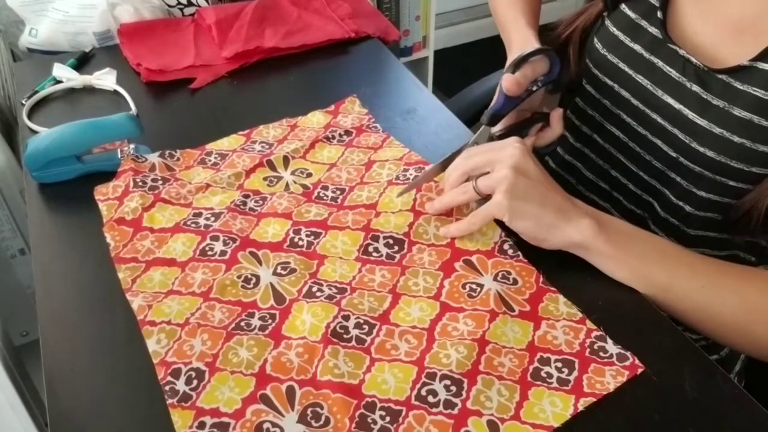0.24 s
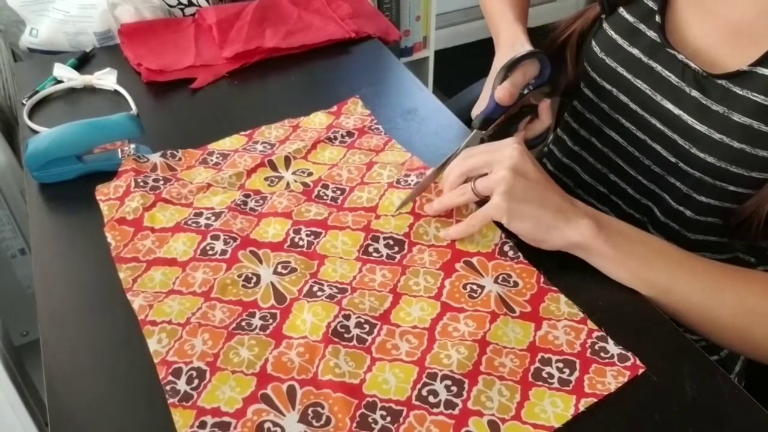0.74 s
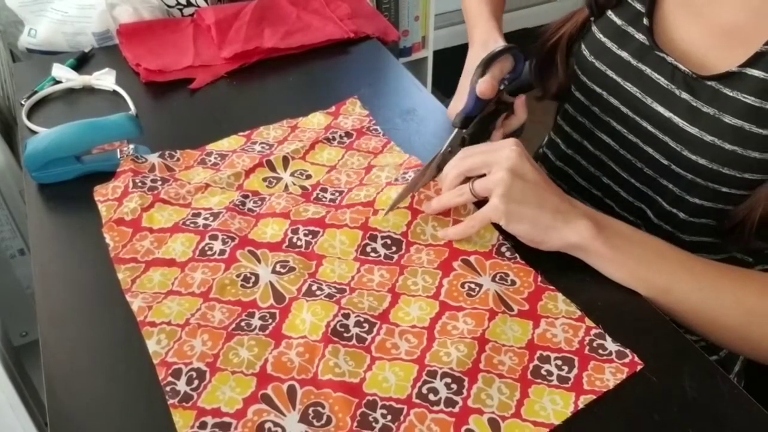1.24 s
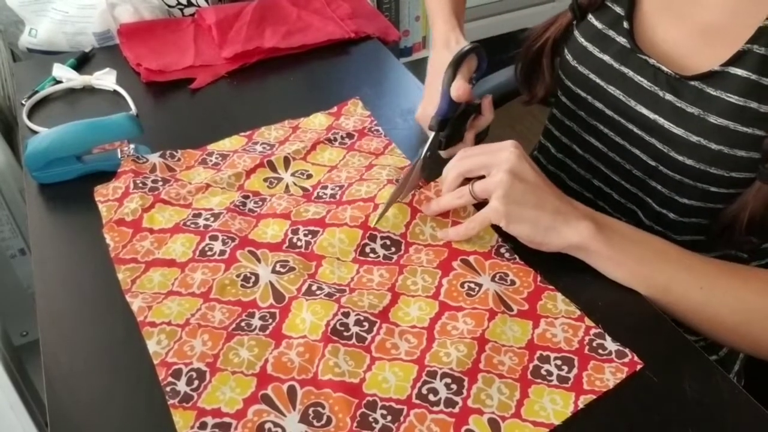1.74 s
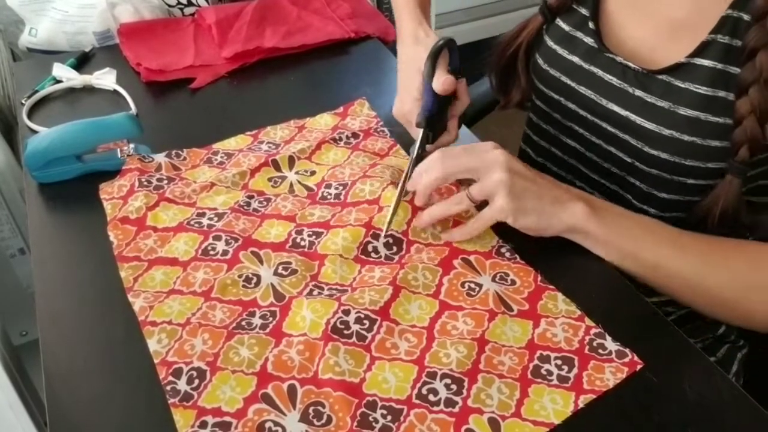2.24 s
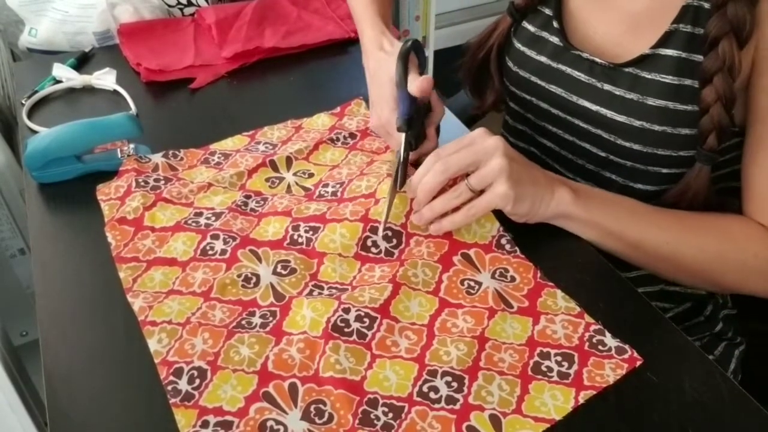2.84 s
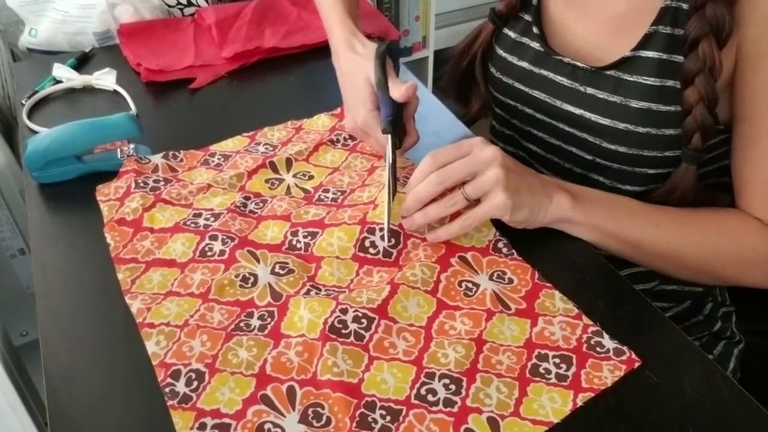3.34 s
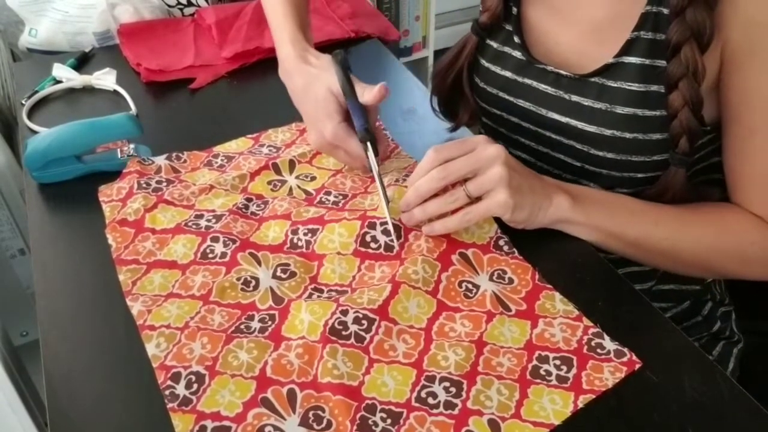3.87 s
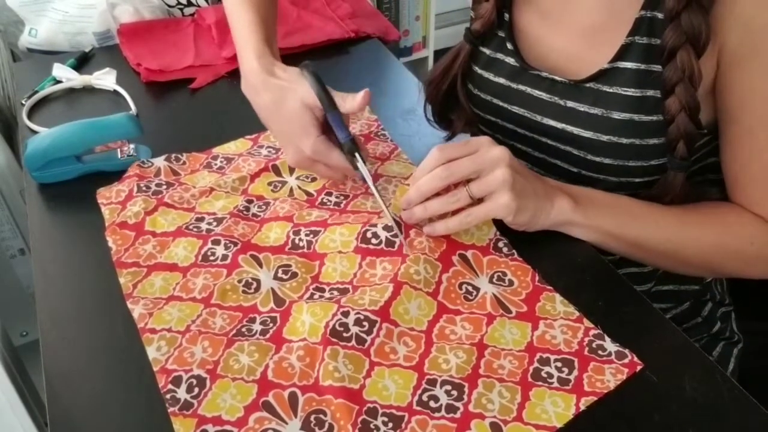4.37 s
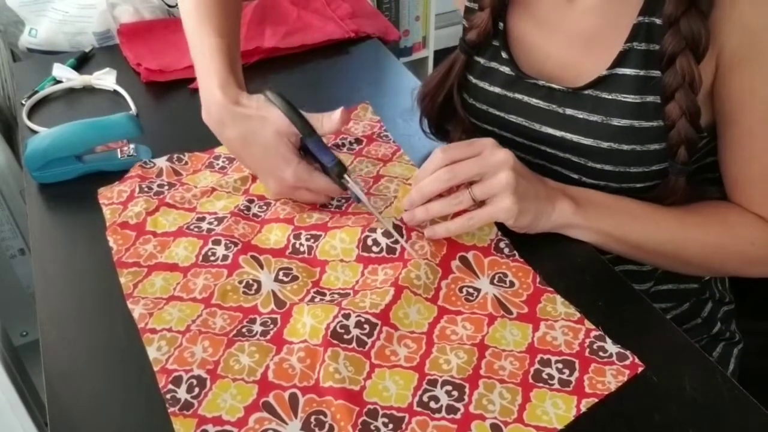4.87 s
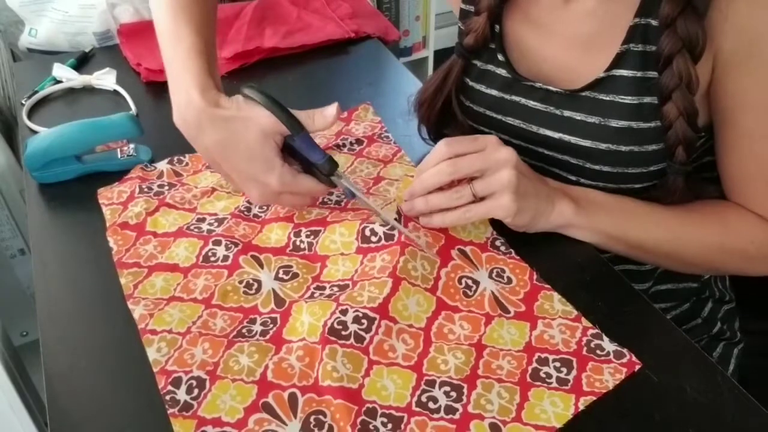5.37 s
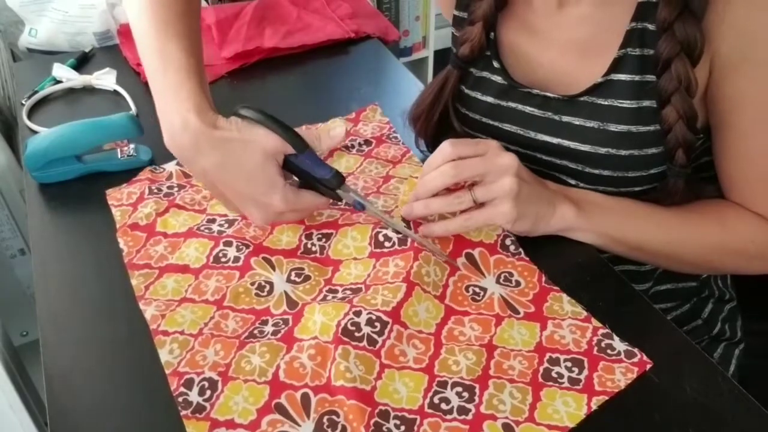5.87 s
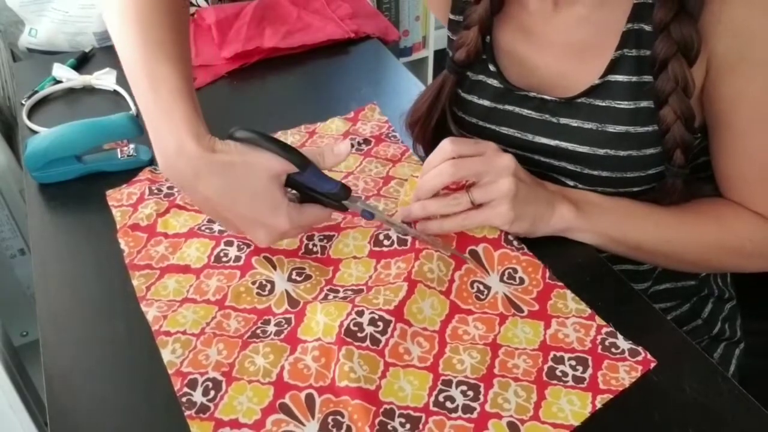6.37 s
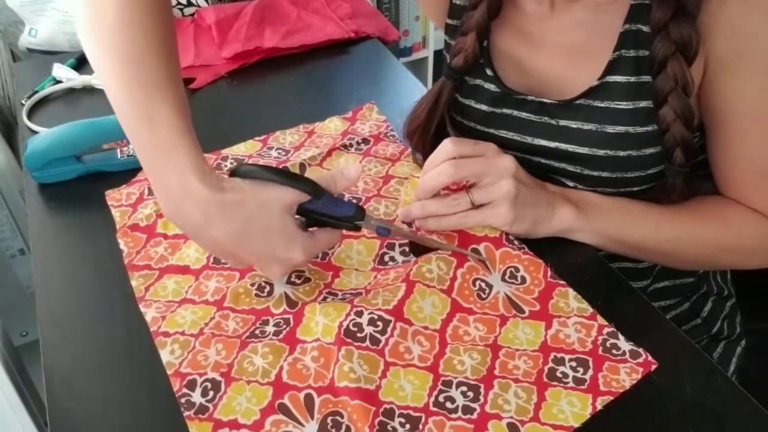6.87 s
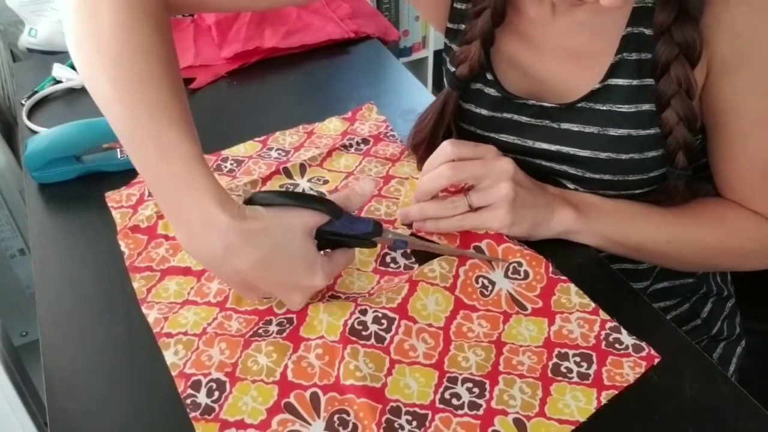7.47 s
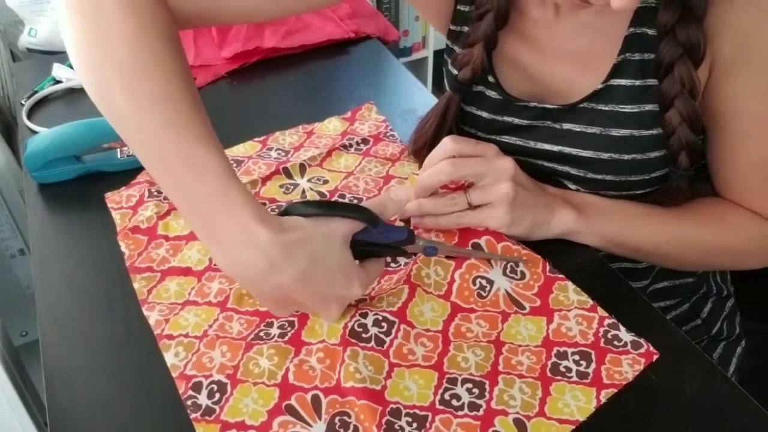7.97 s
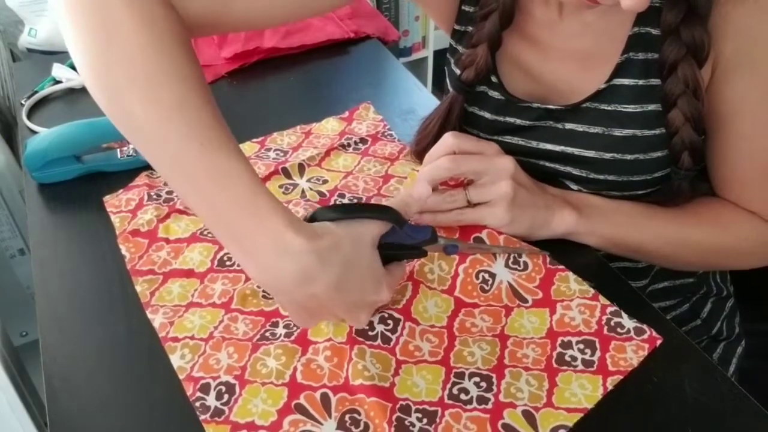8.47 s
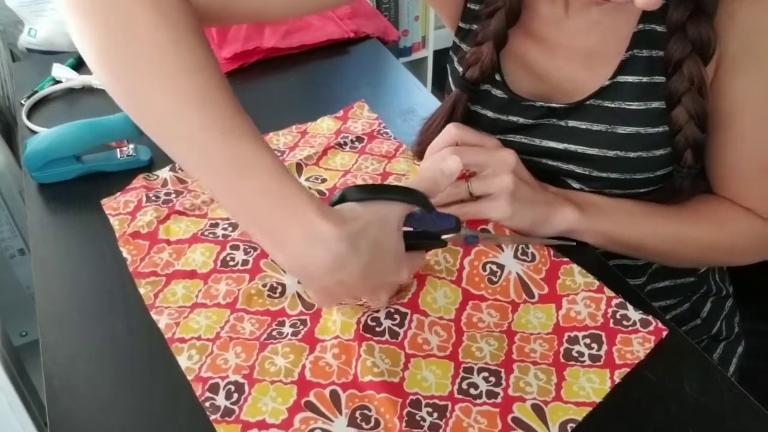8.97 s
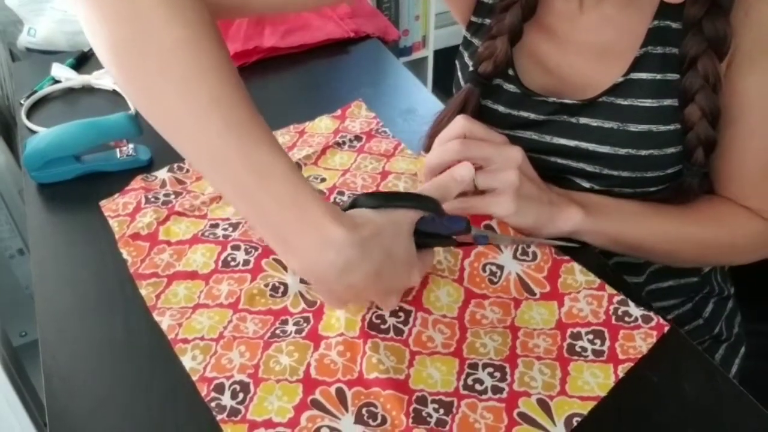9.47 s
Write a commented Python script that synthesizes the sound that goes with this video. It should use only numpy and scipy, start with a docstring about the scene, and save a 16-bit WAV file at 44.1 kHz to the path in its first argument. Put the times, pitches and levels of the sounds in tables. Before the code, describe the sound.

Scissors snip through cotton cloth on a table in a quiet room, with crisp rasping cuts, hollow wooden knocks and one small squeak.

```python
"""Scissors cutting cotton on a table

Scissors cut a cotton sheet in a small, quiet room: filtered snaps and rubbing make the steel rasp, with ringing.
At first the lower blade also lies on the top, which booms as a resonator with snapping threads and knocks.
Then the scissors are lifted and the thin rasp leads; at last they knock down again and once squeak by stick-slip.
A brief squeal of tight edges marks an early cut. Faint hiss, air noise and two sine hums lie beneath."""
import sys
import numpy as np
from scipy import signal
from scipy.fft import rfft, irfft
from scipy.io import wavfile
from scipy.ndimage import uniform_filter1d

SR = 44100
rng = np.random.default_rng(int(sys.argv[2]) if len(sys.argv) > 2 else 0)


def to_wav(sig):
    """Store sig (one row per channel, or 1-D mono) as 16-bit WAV at the path in sys.argv[1].

    Samples outside -1..1 are clipped; the rate is SR.
    """
    pcm = np.clip(np.atleast_2d(sig), -1, 1) * 32767
    pcm = np.round(pcm).astype(np.int16)
    wavfile.write(sys.argv[1], SR, pcm.T)  # frames by channels


N = 428652
TIME = np.arange(N) / SR  # s


def amp(db):
    """Level to amplitude ratio: 20 dB is a factor of ten."""
    return 10 ** (np.asarray(db) / 20)


def evened(x):
    """Normalization to an rms value of 1."""
    return x / np.sqrt(np.mean(x ** 2) + 1e-20)


def read(points, hz):
    """Linear interpolation of a spectrum on a log-frequency axis."""
    f, value = np.transpose(points)
    return np.interp(np.log(hz + 1), np.log(f + 1), value)


def add(mix, s, sound):
    """Superposition: a sound of one or more channels joins the mix at time s."""
    part = mix[:, max(round(s * SR), 0):][:, :sound.shape[1]]
    part += sound[:, :part.shape[1]]


def band(x, lo_hz, hi_hz):
    """Causal Butterworth band-pass."""
    sections = signal.butter(3, [lo_hz, min(hi_hz, SR / 2 - 1)], "band", fs=SR, output="sos")
    return signal.sosfilt(sections, x)


def convolve(x, response):
    """Linear system: output is the convolution of input and impulse response."""
    return signal.oaconvolve(np.atleast_2d(x), np.atleast_2d(response), axes=1)[:, :N]


def bell(hz, centre_hz, width_hz):
    """Lorentzian resonance curve, 1 at its centre."""
    return 1 / (1 + (2 * (hz - centre_hz) / width_hz) ** 2)


def ring(spectrum, modes=(), size=4096):
    """Minimum-phase impulse response of a body with this spectrum and these modes, energy 1."""
    hz = abs(np.fft.fftfreq(size, 1 / SR))
    db = read(spectrum, hz) + sum(lift * bell(hz, f, width) for f, width, lift in modes)
    # the Hilbert transform of the log magnitude gives the phase of a causal body
    log_response = np.conj(signal.hilbert(np.log(amp(db))))
    h = np.fft.ifft(np.exp(log_response)).real[:size // 2]
    return h / np.linalg.norm(h)


def resonate(x, hz, width_hz):
    """Tracking resonator of gain 1: shift the curve hz to zero, smooth with one pole, shift back."""
    turn = np.exp(2j * np.pi * np.cumsum(hz) / SR)
    r = np.exp(-np.pi * width_hz / SR)
    smoothed = signal.lfilter([1 - r], [1, -r], x / turn + 1e-18)
    return 2 * (turn * smoothed).real


def grains(per_s, spread_db, rub):
    """Point process: tiny snaps of uneven size over smooth noise, at a steady mean power."""
    size = amp(spread_db * np.minimum(rng.exponential(1, N), 4)) * rng.choice([-1, 1], N)
    snaps = evened(size * (rng.random(N) < per_s / SR))
    x = snaps + rub * rng.standard_normal(N)
    return x / np.sqrt(uniform_filter1d(x ** 2, size=1300) + 1e-9)


def wander(per_s):
    """Slow random modulation of rms 1, with per_s random values a second joined by lines."""
    values = rng.standard_normal(8192)
    return evened(np.interp(TIME * per_s, np.arange(len(values)), values))


def envelope(start, length, swell_db, attack_s, release_s):
    """Amplitude history: linear rise, a hold that swells or sags about gain 1, exponential release."""
    t = TIME - start
    held = amp(swell_db * (np.clip(t / length, 0, 1) - .5))
    return np.clip(t / attack_s, 0, 1) * held * np.exp(-np.clip((t - length) / release_s, 0, 20))


# likeness of diffuse sound at the two microphones: (f/Hz, coherence)
COHERENCE = [(30, .99), (200, .99), (330, .96), (600, .4), (1100, .05), (15000, 0)]


def diffuse(count):
    """Diffuse-field coherence: white noise from all sides is alike at both microphones only in the bass."""
    a, b = rfft(rng.standard_normal((2, count)))
    same = np.clip(read(COHERENCE, np.fft.rfftfreq(count, 1 / SR)), -1, 1)
    return irfft([a, same * a + np.sqrt(1 - same ** 2) * b], count)


def room(wet_db, t60, treble_t60, scatter_db, lag_ms=0, right_db=0, count=16000):
    """Room impulse response of energy 1: direct sound, early scatter and exponentially decaying tail."""
    t, hz = np.arange(count) / SR, np.fft.rfftfreq(count, 1 / SR)
    noise = diffuse(count)
    treble = irfft(rfft(noise) * read([(1000, 0), (10000, 1)], hz), count)
    tail = (noise - treble) * amp(-60 * t / t60) + treble * amp(-60 * t / treble_t60)
    tail *= 1 - np.exp(-t / 0.0045)  # gradual build-up
    scatter = diffuse(count) * np.exp(-t / 0.0034)
    h = amp(wet_db) * tail / np.linalg.norm(tail[0])
    h += amp(scatter_db) * scatter / np.linalg.norm(scatter[0])
    h[:, 0] += 1  # direct sound
    z = rfft(np.roll(h, 44, axis=1))  # all of it starts 44 samples late
    # above the bass the left microphone receives it later and weaker
    apart = read([(200, 0), (340, .25), (700, 1)], hz)
    z[0] *= np.exp(-2j * np.pi * hz * apart * lag_ms / 1000) * amp(-right_db * apart)
    h = irfft(z, count) * np.minimum(1, 2 * (1 - t / t[-1])) ** 2  # fades to silence at the end
    return h / np.linalg.norm(h.mean(0))


# relative spectrum of the still room air: (f/Hz, density level/dB per Hz)
AIR_SPECTRUM = [(12, -43.5), (20, -22), (48, -4.5), (91, -9), (123, -2), (145, -14.5), (186, -8),
                (220, -17), (315, -22.5), (342, -31), (371, -25), (438, -32), (1180, -37.5), (1640, -40.5),
                (14500, -45.5)]


def air():
    """Broadband noise: still room air as a filtered diffuse field, -60 dB rms."""
    noise = irfft(rfft(diffuse(N)) * amp(read(AIR_SPECTRUM, np.fft.rfftfreq(N, 1 / SR))), N)
    return amp(-60) * evened(noise)


def motor():
    """Modulated sinusoid: a distant motor hums throughout, wavering in amplitude and phase."""
    level_db, hum_hz = -61.5, 119.1
    gain = amp(level_db + 4.2 * wander(per_s=11))
    return gain * np.sin(2 * np.pi * hum_hz * TIME + 1.48 * wander(per_s=4.5))


# relative spectrum of the faint hiss: (f/Hz, density level/dB per Hz)
HISS_SPECTRUM = [(300, -15.5), (1200, 4), (3000, -3), (7000, -6.5), (12000, 2.5), (15000, -4)]


def faint_hiss():
    """Broadband noise: a very faint, slowly wavering hiss all along."""
    noise = grains(per_s=900, spread_db=2.5, rub=0.7) * amp(-0.5 * wander(per_s=4.7))
    noise = amp(-84) * evened(convolve(noise, ring(HISS_SPECTRUM)))
    return convolve(noise, room(wet_db=0, t60=0.068, treble_t60=0.15, scatter_db=3))


# relative spectra of the table top near its edge and further in: (f/Hz, density level/dB per Hz)
EDGE_SPECTRUM = [(40, -55), (100, -16), (170, -8.5), (270, 7.5), (430, -11), (620, -2.5), (850, -4),
                 (1100, -14.5), (1900, -23.5), (3000, -30.5), (4500, -37), (7000, -46.5), (10000, -66),
                 (15000, -26)]
INNER_SPECTRUM = [(40, -30), (100, -5.5), (220, 5), (340, -4.5), (470, -11.5), (750, 2.5), (1050, -6),
                  (1400, -20.5), (2300, -14.5), (3200, -22), (4200, -28), (6500, -33.5), (9000, -42.5),
                  (15000, -42)]
# resonances of the table top: (f/Hz, width/Hz, lift/dB)
TABLE_MODES = [(120.4, 46, 15.5), (189.7, 16, 2), (231.6, 38, 7.5), (287, 58, 6.5), (369, 26, 8.5),
               (442.5, 21, 11), (523, 90, 12.5), (579, 75, 3.5), (600, 36, 1), (666, 7.5, 8), (717, 7.1, 8),
               (780.3, 31, 9.5), (916, 30, 5), (1038, 14, 7.5), (1180, 26, 3), (1260, 9.4, -3.5),
               (1273, 78, 7.5), (1479, 68, 6), (1490, 66, 1), (1660, 20, 7.5), (2439, 40, 6.5),
               (2860, 160, 5.5)]


def top(s):
    """Modal response of the plate: driven near its edge before 4 s, further in afterwards."""
    return ring(EDGE_SPECTRUM if s < 4 else INNER_SPECTRUM, TABLE_MODES, size=8192)


# the blade knocks on the table: (t/s, blow level/dB, then relative to it before fixed band trims:
# hardness as treble level/dB, hollow middle level/dB, weight as bass level/dB)
KNOCK_EVENTS = [(0.02, -43.5, -26, -5, -19), (0.441, -38, -38, -7, -7), (0.474, -31, -19, -0.5, -16),
                (0.517, -35.5, -40, -16, -25), (0.745, -51, -30, -12, -21), (0.812, -26, -16.5, -3.5, -4),
                (0.848, -34.5, -22, 2, -15), (1.141, -35.5, -13.5, 5.5, 2), (1.315, -51, -39, -31, -24),
                (1.413, -35, -36, -7.5, -19), (1.549, -27, -13.5, -0.5, -14),
                          (1.568, -26.5, -15.5, -10.5, -7), (1.689, -36.5, -40, -5, -5),
                (2.043, -30.5, -28, -8, -8), (2.072, -32, -18.5, -21, -20), (2.18, -40.5, -27, -8.5, -29),
                (2.238, -30.5, -33, -6, -18), (2.289, -34.5, -32, -15.5, -2),
                (6.172, -39.5, -39, -19.5, -11.5), (6.708, -29.5, -34, -8, -7),
                (7.193, -39.5, -40, -1.5, -30), (7.93, -33.5, -12, -7.5, -17), (7.946, -41.5, -8, 2, -14),
                (8.318, -34, -15.5, -4.5, -8), (8.42, -41, -40, -18, -17), (8.48, -42, -18, -7, -30),
                (8.916, -32, -8.5, -7, -9.5), (9.027, -34, -17.5, -3, -19), (9.583, -26.5, -27, -10, -12.5)]


def knocks():
    """Impact excitation of a plate: harder blows ring brighter, heavier ones deeper."""
    damp_s = .04  # the resting hand soon stills the deep ring of the top
    out = np.zeros((2, N))
    for s, db, hard_db, hollow_db, weight_db in KNOCK_EVENTS:
        here = room(wet_db=5.0, t60=0.22, treble_t60=0.22, scatter_db=0.0, lag_ms=0.46, right_db=2.5)
        blow = convolve(top(s), here)
        damped = blow * np.exp(-np.arange(blow.shape[1]) / SR / damp_s)
        parts = [(damped, 50, 240, weight_db + 2.0), (damped, 183, 445, -1.5),
                 (blow, 435, 1080, hollow_db - 5.5), (blow, 1380, 12000, hard_db - 3.0)]
        for sound, lo_hz, hi_hz, part_db in parts:
            part = band(sound, lo_hz, hi_hz)
            peak = np.sqrt(uniform_filter1d(part.mean(0) ** 2, size=300).max())  # highest short-time rms
            add(out, s - .001, amp(db + part_db) * part / peak)
    return out


# the lower blade bears on the top as it cuts or slides: (t/s, length/s, boom drive level/dB,
# swell/dB, then relative to the boom: hollow middle level/dB, scratch level/dB)
SLIDE_EVENTS = [(0.025, 0.13, -55, -16.5, 0.5, -30.5), (0.366, 0.079, -57.5, 18, 1, -8),
                (0.43, .08, -45, 10, 2, -13), (0.52, .2, -58, -1, -3, -22),
                (0.732, 0.032, -52.5, 9, 0.5, -22), (0.769, 0.088, -39, 5, 2.5, -13),
                (0.897, 0.269, -57, 8, 1.5, -15.5), (1.122, 0.051, -31, -8.5, -1.5, -16.5),
                (1.303, .16, -51.5, -8, 0, -9.5), (1.536, 0.041, -39.5, -0.5, 9, -10),
                (1.59, 0.11, -54, -6, -1, -13), (1.731, 0.099, -52.5, -1, 0, -14.5),
                (1.853, 0.15, -54, 1, -2.5, -27), (2.042, 0.089, -49.5, -14, -1.5, -21),
                (2.232, 0.12, -57, -13.5, -2, -16), (6.176, 0.048, -56, -8, -12.5, -34),
                (6.698, 0.058, -45, -9.5, -3, -21), (7.184, 0.13, -49.5, 2, -1, -14.5),
                (7.317, 0.053, -55.5, -16.5, 7.5, -0.5), (7.933, 0.12, -52.5, -18, -13, -12),
                (8.319, 0.18, -51.5, -10, -6, -16), (8.988, .15, -49, -6.5, -2.5, -13.5),
                (9.159, 0.083, -53, 4.5, -28, -29), (9.582, 0.11, -48, -19, -3, -15)]


def crunch():
    """Forced vibration of a plate: snapping threads and the sliding blade drive the table top."""
    out = np.zeros((2, N))
    snaps = grains(per_s=520, spread_db=3.5, rub=0.53) * amp(4.7 * wander(per_s=55))
    for start, length, db, swell_db, hollow_db, scratch_db in SLIDE_EVENTS:
        force = amp(db) * envelope(start, length, swell_db, attack_s=0.011, release_s=.016)
        inside = (TIME >= start) & (TIME <= start + length + .1)
        shaken = signal.oaconvolve(snaps[inside], top(start))[:inside.sum()]
        # boom, hollow middle, scratch
        parts = [(40.3, 404, 0), (510, 1140, hollow_db), (1367, 5700, scratch_db)]
        sound = sum(evened(band(shaken, lo_hz, hi_hz)) * amp(part_db) for lo_hz, hi_hz, part_db in parts)
        here = room(wet_db=2.5, t60=0.15, treble_t60=0.26, scatter_db=-1.5, lag_ms=0.5, right_db=1.5)
        add(out, start, convolve(force[inside] * sound, here))
    return out


def cuts():
    """Grouping in time: squeezes in quick succession make one closing, with a start and an end."""
    start, length = np.transpose(SQUEEZE_EVENTS)[:2]
    end = start + length
    reopened = start[1:] - end[:-1] > .15  # a longer wait, in s, begins a new cut
    return start[np.r_[True, reopened]], end[np.r_[reopened, True]]


SQUEEZE_SHAPE = dict(attack_s=0.015, release_s=0.017)
# the hand squeezes the blades together: (t/s, length/s, rasp drive level/dB,
# swell from start to end/dB, lower hiss level relative to the rasp/dB)
SQUEEZE_EVENTS = [(0.411, 0.11, -61, 6, -1), (0.762, 0.1, -62.5, 1, -3.5), (1.123, 0.04, -54.5, 6, -6.5),
                  (1.536, 0.069, -58, -16, -7.5), (2.036, 0.032, -66.5, 11, -4.5),
                  (2.351, 0.014, -63.5, 4, -2), (2.866, 0.1, -69.5, 18, -1), (3.285, 0.079, -63, 7, -2.5),
                  (3.73, 0.028, -61.5, 1, -2), (3.79, 0.043, -64.5, -22, 2), (4.231, 0.061, -55.5, 1.5, -4),
                  (5.116, .012, -60.5, 1, -5.5), (5.136, 0.058, -55.5, 3, -8), (5.688, .018, -66, -7, -8),
                  (5.747, .02, -61.5, 0, -7.5), (6.345, 0.098, -56.5, 7, -8), (6.865, 0.095, -61, 0, -0.5),
                  (7.414, .036, -55, -10, -7), (7.46, 0.069, -52, 11, -9), (7.985, 0.065, -50, 5.5, -8.5),
                  (8.466, .014, -65, 2, -6), (8.515, 0.043, -50.5, -3, -11), (8.865, 0.009, -57, 5.5, -11),
                  (9.222, 0.13, -60, 16.5, -10), (9.376, 0.011, -52, 6, -9.5)]
# gliding blade rings: (f open/Hz, f closed/Hz, width/Hz, level open/dB, level closed/dB)
GLIDING_RINGS = [(12670, 6800, 82, 20, -3), (10830, 16200, 300, -7.5, -1.5), (8650, 24000, 1200, 4, 2)]
# the edges catch and let go: (t/s, drive level/dB before a fixed trim)
CATCHES = [(3.32, -46), (3.394, -49.5), (3.8033, -39.5), (4.309, -43.5), (5.1811, -36.5), (5.7014, -49),
           (5.9836, -54), (6.3803, -40), (6.454, -39.5), (6.9008, -44), (6.9523, -40.5), (7.4824, -33.5),
           (8.5285, -40), (9.3029, -43.5), (9.351, -41.5)]
# relative spectrum of the blades: (f/Hz, density level/dB per Hz)
STEEL_SPECTRUM = [(200, -7), (600, -15), (1300, -16.5), (1950, -12.5), (2500, -20.5), (3400, -15.5),
                  (4300, -13), (5600, -9), (7300, -13.5), (8800, -13.5), (10500, -7), (12200, 5),
                  (13500, -7.5), (15000, -13.5)]
# resonances and a hollow of the blades: (f/Hz, width/Hz, lift/dB)
BLADE_MODES = [(2010, 430, -0.5), (2310, 140, 1), (3190, 460, -21), (5600, 430, 3), (7300, 3200, 1)]
# the scissors drift to the right: (t/s, level at the right microphone above the left/dB)
RIGHTWARD_DRIFT = [(0, .5), (1.6, 0), (2.9, 2.3), (5.7, 2), (6.4, 4), (9.3, 4.7)]


def blades():
    """Friction-driven resonance: edges rasp, two rings glide up and one down, a lower scrape grows."""
    starts, ends = cuts()
    closed, rasp, hiss = np.zeros((3, N))
    for start, end in zip(starts, ends):
        after = TIME >= start
        closed[after] = np.interp(TIME[after], [start, end], [.2, .7])  # 0 open, 1 closed
    for start, length, db, swell_db, hiss_db in SQUEEZE_EVENTS:
        force = amp(db) * envelope(start, length, swell_db, **SQUEEZE_SHAPE)
        rasp += force
        hiss += force * amp(hiss_db)
    friction = grains(per_s=1300, spread_db=2.5, rub=0.42)
    friction *= amp(2 * wander(per_s=250) + 1.3 * wander(per_s=70))
    rasp, hiss = friction * rasp, friction * hiss
    drive = amp(-6.5) * band(rasp, 9400, 24400) + amp(8.0) * band(hiss, 250, 9000)
    # the lower scrape grows as the crossing point nears the tips
    drive += band(hiss, 1630, 3270) * amp(-12.5 + 38.6 * closed)
    for open_hz, closed_hz, width_hz, open_db, closed_db in GLIDING_RINGS:
        hz = (open_hz + (closed_hz - open_hz) * closed) * (1 + 0.036 * wander(per_s=16))
        ring_db = open_db + (closed_db - open_db) * closed + 0.75 * wander(per_s=24)
        drive += resonate(rasp, hz, width_hz) * amp(ring_db)
    t = np.arange(900) / SR
    catches = np.zeros((1, N))
    for s, db in CATCHES:
        burst = rng.standard_normal((1, len(t))) * np.exp(-t / 0.006)
        add(catches, s - .002, amp(db - 5.5) * burst)
    steel = convolve(drive + catches[0], ring(STEEL_SPECTRUM, BLADE_MODES))[0]
    out = np.zeros((2, N))
    # the scissors have moved on at each cut, so hands and table scatter their sound anew
    for s, part in zip(starts, np.split(steel, [round(s * SR) for s in starts])[1:]):
        add(out, s, convolve(part, room(wet_db=3.5, t60=0.28, treble_t60=0.15, scatter_db=7)))
    right_db = np.interp(TIME, *np.transpose(RIGHTWARD_DRIFT))
    return out * amp(right_db * [[-.5], [.5]])


def drone():
    """Modulated sinusoid: a deep hum of the building comes and goes."""
    level_db, hum_hz = -57.5, 52.4
    gain = amp(level_db + 0.63 * wander(per_s=2.5))
    tone = gain * np.sin(2 * np.pi * hum_hz * TIME + .5 * wander(per_s=7.4))
    return tone * envelope(start=0.5, length=3.27, swell_db=0, attack_s=0.29, release_s=0.29)


def squeal():
    """Narrow-band resonance: tight edges set one blade ringing for a moment in one cut."""
    tone = evened(resonate(rng.standard_normal(N), np.full(N, 2466), width_hz=34))
    force = envelope(start=0.772, length=0.056, swell_db=9, **SQUEEZE_SHAPE)
    tone = amp(-57.5) * band(tone, 2300, 3500) * force
    return convolve(tone, room(wet_db=-11, t60=0.17, treble_t60=.2, scatter_db=4))


# arches of the squeak along the top: (t/s, length/s, f/Hz, glide/Hz per s, drive level/dB)
SQUEAK_ARCHES = [(7.226, .098, 533, -400, -39.5), (7.314, 0.041, 557, 1102, -40.5),
                 (7.352, 0.05, 562, 3, -45)]
# harmonics of the squeak: (multiple of the pitch, relative level/dB)
SQUEAK_HARMONICS = [(1, -4), (2, -21), (3, -25), (4, -40), (5, -39)]


def squeak():
    """Stick-slip oscillation: steel on the table gives gliding arches of tone, each slip a puff of scratch."""
    hz, gain = np.full(N, float(SQUEAK_ARCHES[0][2])), np.zeros(N)
    for start, length, pitch_hz, glide_hz_per_s, db in SQUEAK_ARCHES:
        inside = (TIME > start) & (TIME < start + length)
        t = TIME[inside] - start
        hz[inside] = pitch_hz + glide_hz_per_s * (t - length / 2)
        gain[inside] += amp(db) * abs(np.sin(np.pi * t / length)) ** 1.1  # the power sets how pointed
    turns = np.cumsum(hz * (1 + .027 * wander(per_s=260))) / SR  # jittered pitch, in cycles
    tone = sum(amp(db) * np.sin(2 * np.pi * round(k) * turns) for k, db in SQUEAK_HARMONICS)
    slips = band(rng.standard_normal(N) * np.exp(-(turns % 1) / 0.18), 900, 2200)
    flutter = amp(2 * wander(per_s=70))
    sound = (evened(tone) + amp(-21.5) * evened(slips)) * gain * flutter
    here = room(wet_db=-11, t60=.14, treble_t60=0.17, scatter_db=-12, lag_ms=0.29, right_db=4.0)
    return convolve(sound, here)


def scene():
    """Superposition of background, table and scissors."""
    background = air() + motor() + drone() + faint_hiss()
    return background + knocks() + crunch() + blades() + squeal() + squeak()


def record(dry):
    """Low-pass filtering: the recorder's band limit at 14.8 kHz."""
    low_pass = signal.firwin(301, 14800, window=("kaiser", 8), fs=SR)
    return signal.oaconvolve(dry, low_pass[None], "same")


dry = scene()
out = record(dry)
to_wav(out)
```